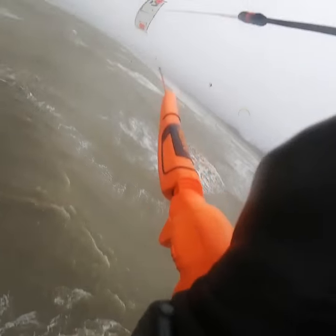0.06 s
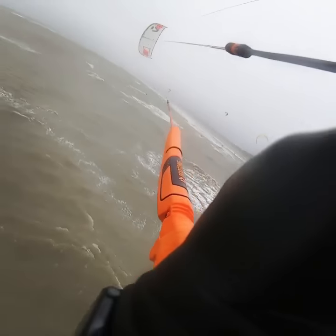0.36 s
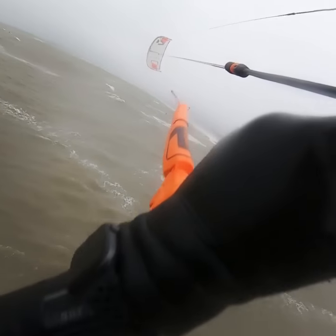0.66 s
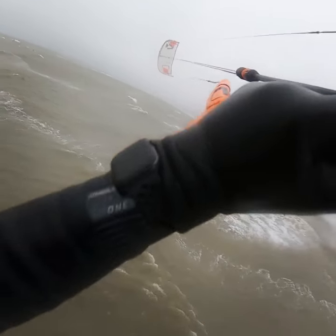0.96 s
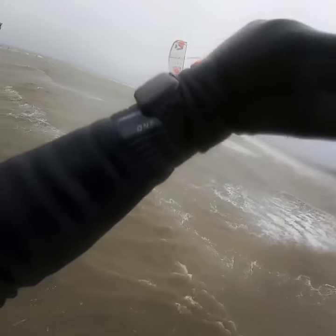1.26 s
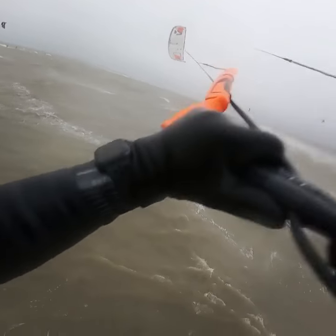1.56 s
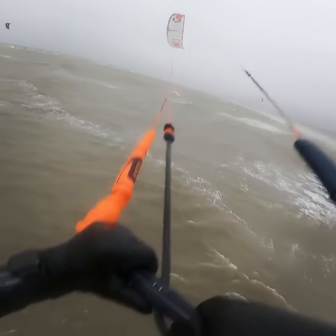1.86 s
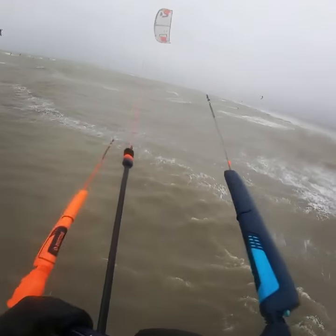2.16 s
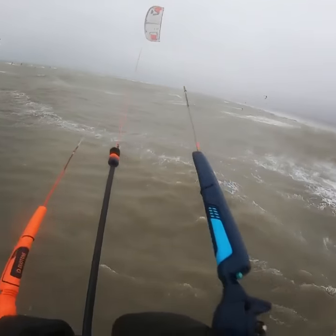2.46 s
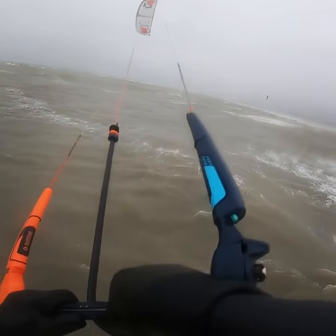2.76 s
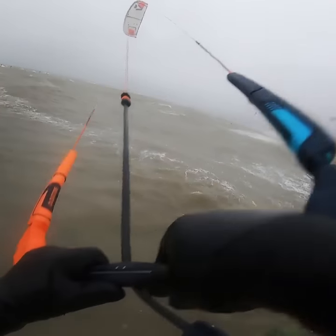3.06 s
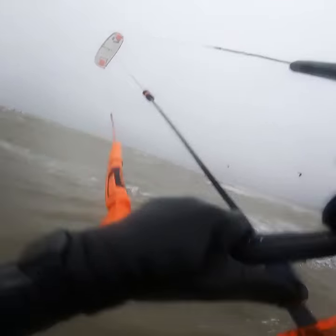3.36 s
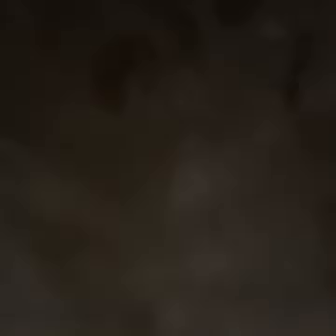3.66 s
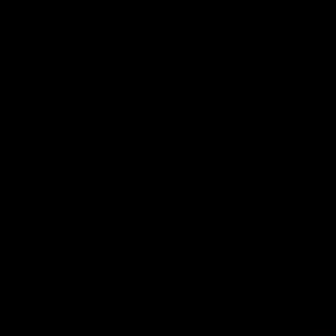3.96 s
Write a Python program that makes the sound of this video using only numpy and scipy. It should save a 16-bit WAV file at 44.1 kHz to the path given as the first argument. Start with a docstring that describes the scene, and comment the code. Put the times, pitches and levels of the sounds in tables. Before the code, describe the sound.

Muffled wind rumble and board thumps on choppy water, then a splash and gurgling bubbles.

```python
"""Wind buffets a kitesurfer's muffled body camera: turbulent pressure rumbles and gusts on the
microphone over the wash of the board, which thumps across the chop and drones as it settles.
The board digs in, drop impacts build into spray, and the rider hits the water with a sharp splash.
Under the surface, water slaps the housing, and trapped air resonates as ringing pockets,
a low churn of big bubbles and a fizz of small ones."""
import sys
import numpy as np
from scipy import signal
from scipy.fft import rfft, irfft
from scipy.io import wavfile
from scipy.ndimage import uniform_filter1d

SR = 44100
rng = np.random.default_rng(int(sys.argv[2]) if len(sys.argv) > 2 else 0)


def unload_wav(signal):
    """Save mono or channel-first audio to the path in sys.argv[1] as 16-bit WAV at rate SR, clipped to [-1, 1]."""
    wavfile.write(
        sys.argv[1],
        SR,
        np.round(np.clip(np.atleast_2d(signal).T, -1, 1) * 32767).astype(np.int16),
    )


N = 176400
TIME, FREQ = np.arange(N) / SR, np.fft.rfftfreq(N, 1 / SR)
ONSET_S, RELEASE_S = 0.01, 0.04


def amp(db):
    """Amplitude ratio of a level in decibels."""
    return 10 ** (np.asarray(db) / 20)


def unit(x):
    """Normalisation to rms 1."""
    return x / np.sqrt(np.mean(x ** 2) + 1e-20)


def envelope(points):
    """Amplitude along a level curve, fading in just before its first point and holding its last."""
    s, db = np.transpose(points)
    return amp(np.interp(TIME, s, db)) * np.clip(1 + (TIME - s[0]) / ONSET_S, 0, 1) ** 2


def until(s):
    """Linear fade-out that begins at time s."""
    return np.clip(1 - (TIME - s) / RELEASE_S, 0, 1)


def response(spectrum, hz):
    """Magnitude response interpolated over log frequency, silent above its last point."""
    f, db = np.transpose(spectrum)
    return amp(np.interp(np.log(hz + 1), np.log(f), db, right=-140))


def colour(x, spectrum):
    """Zero-phase filtering by a spectrum, to rms 1."""
    return unit(irfft(rfft(x) * response(spectrum, FREQ), N))


def lowpass(x, cutoff_hz):
    """Zero-phase low-pass filtering with a fourth-order slope."""
    return irfft(rfft(x) / (1 + (FREQ / cutoff_hz) ** 4), N)


def wander(rate_hz):
    """Smooth random modulation at around the given rate, rms 1."""
    ratio = FREQ / rate_hz
    return unit(irfft(rfft(rng.standard_normal(N)) * ratio * np.exp(-ratio ** 2), N))


def turbulence(spectrum, rough_db, rate_hz):
    """Intermittency: eddies modulate the level of coloured noise."""
    return unit(colour(rng.standard_normal(N), spectrum) * amp(rough_db * wander(rate_hz)))


def steady(x, span_s):
    """Division by the running rms evens out slow swells and keeps the fine grain."""
    size = max(int(span_s * SR), 3)
    power = uniform_filter1d(uniform_filter1d(x ** 2, size), size)
    return x / np.sqrt(abs(power) + 1e-6)


def impacts(per_s, spread_db):
    """Shot noise: a Poisson train of impulses of uneven size."""
    arrivals = (rng.random(N) < per_s / SR) * rng.choice([-1., 1.], N)
    return arrivals * amp(spread_db * np.minimum(rng.exponential(1, N), 3))


def bubbles(per_s, low_hz, high_hz, cycles, glide, spread_db, count=28):
    """Bubble resonance: randomly struck damped oscillators that decay by 1/e in `cycles` periods."""
    out = np.zeros(N)
    for hz in np.geomspace(low_hz, high_hz, count):
        age = np.arange(int(6 * cycles / hz * SR)) * hz / SR / cycles  # in decay times
        shape = (1 - np.exp(-age * 6)) * np.exp(-age)
        ring = shape * np.sin(2 * np.pi * cycles * (age + glide * age ** 2))
        out += signal.oaconvolve(impacts(per_s / count, spread_db), ring * hz / high_hz)[:N]
    return unit(out)


# pressure on the microphone: t/s, level/dB
RUMBLE_LEVEL = [(0, -34), (.25, -45), (.5, -31.5), (.66, -37), (.82, -19), (1.0, -28), (1.45, -26),
                (1.55, -17.5), (1.66, -22.5), (1.82, -16.5), (1.92, -20), (2, -29.5), (2.4, -17.5),
                (2.52, -22), (3, -15), (3.63, -15), (3.7, -41), (3.76, -14.5), (4, -18.5)]
# its spectrum: f/Hz, relative level/dB
RUMBLE_SPECTRUM = [(10, -6), (24, 2), (40, -7), (110, -12.5), (200, -35), (900, -100)]


def rumble():
    """Pseudo-sound: deep pressure swings of air, then water, flowing over the microphone."""
    pressure = turbulence(RUMBLE_SPECTRUM, rough_db=2.5, rate_hz=11)
    return envelope(RUMBLE_LEVEL) * steady(pressure, span_s=0.055)


# gusts across the microphone port: t/s, level/dB
GUST_LEVEL = [(0, -58), (.74, -50.5), (.86, -28.5), (1.06, -43), (1.39, -22.5), (1.5, -33.5), (1.95, -30),
              (2.25, -26.5), (2.6, -21), (2.73, -23), (2.97, -19.5), (3.08, -23.5), (3.5, -16)]
# their spectrum: f/Hz, relative level/dB
GUST_SPECTRUM = [(40, -25), (150, 3), (300, -1), (450, -8.5), (680, -23), (900, -46), (2200, -69.5)]


def wind():
    """Turbulent buffeting: eddies strike the microphone port until it goes under."""
    eddies = turbulence(GUST_SPECTRUM, rough_db=3.0, rate_hz=35)
    return envelope(GUST_LEVEL) * steady(eddies, span_s=0.14) * until(3.56)


# water washing past the hull, and the carving edge: t/s, level/dB
WASH_LEVEL = [(0, -45), (.35, -42.5), (.62, -54), (.82, -44.5), (1.38, -30.5), (1.9, -36), (2.45, -50.5)]
CARVE_LEVEL = [(0, -34), (.1, -42.5), (.22, -39), (.35, -33.5), (.5, -52.5)]
# their spectra: f/Hz, relative level/dB
WASH_SPECTRUM = [(110, -10), (320, 4), (440, -4), (580, 7), (760, 1.5), (880, -14), (1180, -7.5),
                 (1400, -21), (1750, -39), (3200, -62.5)]
CARVE_SPECTRUM = [(300, -21), (600, -3), (750, 9), (900, -11.5), (1230, -6.5), (1500, -72.5)]


def board():
    """Flow noise: a muffled wash along the hull and the hollow rush of the carving edge."""
    wash = envelope(WASH_LEVEL) * turbulence(WASH_SPECTRUM, rough_db=0.5, rate_hz=37)
    carve = envelope(CARVE_LEVEL) * turbulence(CARVE_SPECTRUM, rough_db=0.5, rate_hz=110)
    return wash + carve * until(.6)


# blows of the chop: t/s, level/dB, decay/s, frequency scale
CHOP_BLOWS = [(0.677, -35, 0.016, 0.8), (0.789, -18.5, 0.046, 1.065), (1.123, -23.5, 0.035, 0.87),
              (2.042, -19, 0.018, 1.12), (2.157, -17, 0.098, 1.11), (2.367, -18.5, 0.028, 1.02)]
# their spectrum before scaling: f/Hz, relative level/dB
THUMP_SPECTRUM = [(60, -13.5), (150, 5), (290, -0.5), (430, -6), (700, -19), (900, -52), (2200, -72)]


def thumps():
    """Structure-borne sound: dull blows of the board on the chop travel up through the rider."""
    out = np.zeros(N)
    for s, db, decay, scale in CHOP_BLOWS:
        rise = np.clip((TIME - s) / ONSET_S, 0, 1)
        fall = np.exp(-(np.maximum(TIME - s - ONSET_S, 0) / decay) ** 2)
        body = colour(rng.standard_normal(N), [(hz * scale, gain) for hz, gain in THUMP_SPECTRUM])
        out += amp(db) * rise * fall * steady(body, span_s=0.015)
    return out


# hollow drone of the hull after it lands: t/s, level/dB, f/Hz
HULL_DRONE = [(2.152, -20.5, 295.2), (2.388, -25.5, 260), (2.558, -26.5, 166.2), (3.05, -30, 154.7)]


def drone(half_width_hz=45):
    """Narrow-band noise whose centre frequency sinks as the board settles into the water."""
    s, db, hz = np.transpose(HULL_DRONE)
    band = lowpass(rng.standard_normal((2, N)), half_width_hz)
    phase = 2 * np.pi * np.cumsum(np.interp(TIME, s, hz)) / SR
    rush = steady(unit(band[0] * np.cos(phase) + band[1] * np.sin(phase)), span_s=.05)
    return amp(np.interp(TIME, s, db)) * rush * np.clip((TIME - s[0]) / ONSET_S, 0, 1) * until(s[-1])


# spray thrown up as the board digs in: t/s, level/dB
SPRAY_LEVEL = [(3.13, -24), (3.27, -22), (3.33, -19), (3.38, -19.5), (3.428, -15.5), (3.465, -18.5),
               (3.525, -16.5), (3.55, -18)]
# its spectrum at full force: f/Hz, relative level/dB
SPRAY_SPECTRUM = [(50, -15), (200, -1.5), (650, 1.5), (1250, 1), (2400, -12), (3400, -26), (5500, -40.5),
                  (12000, -66.5)]


def spray(db_per_octave=5):
    """Impact noise: drops patter on the camera, and harder spray shifts the spectrum upward."""
    force = envelope(SPRAY_LEVEL)
    hz, s, frames = signal.stft(impacts(per_s=3800, spread_db=3), SR, nperseg=512, noverlap=384)
    force_db = 20 * np.log10(np.interp(s, TIME, force) / force.max())
    scale = 2 ** np.maximum(force_db / db_per_octave, -2)
    frames *= response(SPRAY_SPECTRUM, hz[:, None] / scale)
    patter = signal.istft(frames, SR, nperseg=512, noverlap=384)[1][:N]
    return force * steady(unit(patter), span_s=0.06) * until(3.65)


# sheets of water hitting the camera: t/s, level/dB, rise/s, hold/s, time to fall 40 dB/s
WATER_SHEETS = [(3.373, -31, 0.025, 0.01, 0.0374), (3.551, -14.5, 0.039, 0.021, 0.09),
                (3.617, -20.5, 0.024, 0.02, 0.047)]
# their spectrum at the loudest moment: f/Hz, relative level/dB
SPLASH_SPECTRUM = [(200, -4), (900, 1.5), (2000, -6.5), (3100, -8.5), (6000, -17.5), (10500, -36.5),
                   (13000, -74)]


def splashes():
    """Superposition of drop impacts and bubble rings; the finest spray comes only at the peak."""
    shape = np.zeros(N)
    for s, db, rise, hold, fall in WATER_SHEETS:
        t = TIME - s
        shape += amp(db - 40 * np.maximum(t - rise - hold, 0) / fall) * np.clip(t / rise, 0, 1)
    drops = unit(impacts(per_s=4000, spread_db=5))
    rings = bubbles(per_s=1400, low_hz=900, high_hz=4000, cycles=11, glide=0, spread_db=4.5)
    water = steady(colour(drops + 0.4 * rings, SPLASH_SPECTRUM), span_s=0.042)
    dull = lowpass(water, cutoff_hz=2800)
    return shape * (dull + (water - dull) * (shape / shape.max()) ** 2)


# large air pockets: t/s, starting f/Hz, level/dB, duration/s, glide/(octaves per s)
AIR_POCKETS = [(3.512, 326, -5, 0.019, 19), (3.67, 542, -5, 0.0089, 4.5), (3.688, 450, -17.5, 0.063, -1),
               (3.756, 540, -10.5, .016, -5.5), (3.75, 1088, -26, 0.083, 2.6), (3.785, 779, -26, 0.21, -3),
               (3.791, 397, -14, 0.029, -15), (3.814, 286, -7, 0.029, -9), (3.815, 1146, -21.5, 0.1, -5.5),
               (3.852, 424, -6.5, 0.014, 23), (3.927, 236, -6.5, 0.027, 11), (3.965, 730, -8, 0.013, 5)]


def pockets(skew=0.55):
    """Volume resonance: large air pockets swell and ring with gliding, slightly unsteady pitch."""
    out = np.zeros(N)
    for s, hz, db, length, glide in AIR_POCKETS:
        t = np.clip(TIME - s, 0, length)
        pitch = hz * 2 ** (glide * t) * (1 + 0.0087 * wander(rate_hz=35))
        shape = np.sin(np.pi * (t / length) ** skew) ** 2  # skew below 1: swells faster than it fades
        out += amp(db) * shape * np.sin(2 * np.pi * np.cumsum(pitch * (t > 0)) / SR)
    return out


# churning of the air dragged under: t/s, level/dB
CHURN_LEVEL = [(3.56, -29), (3.6, -13), (3.655, -13.5), (3.685, -26), (3.735, -18), (3.86, -20.5),
               (3.91, -9.5), (4, -18)]


def churn():
    """Air entrainment: big, heavily damped bubbles merge into a low gurgle."""
    gurgle = bubbles(per_s=490, low_hz=109.6, high_hz=540, cycles=2.55, glide=0.026, spread_db=8.0)
    return envelope(CHURN_LEVEL) * steady(gurgle, span_s=0.0075)


def clusters(drive, low_hz=1552, high_hz=4690, width_hz=85, drift=.03, swell_db=8, count=10):
    """Forced resonance: clusters of trapped bubbles ring, each drifting in pitch and level."""
    out = np.zeros(N)
    pole = np.exp(-np.pi * width_hz / SR)
    for hz in np.geomspace(low_hz, high_hz, count):
        pitch = hz * (1 + drift * wander(rate_hz=10.2))
        carrier = np.exp(2j * np.pi * np.cumsum(pitch) / SR)
        # shifting down, low-passing and shifting back makes a band that follows the pitch
        ring = signal.lfilter([(1 - pole) ** 2], [1, -2 * pole, pole ** 2], drive / carrier)
        out += amp(swell_db * np.tanh(wander(rate_hz=22.4))) * (carrier * ring).real
    return out


# slaps of water on the housing: t/s, relative level/dB, decay/s
HOUSING_SLAPS = [(3.588, -11, 0.003), (3.598, -24, 0.004), (3.726, -24.5, 0.0026), (3.7609, -13.5, 0.0021),
                 (3.778, -25, 0.005), (3.8165, -13.5, 0.012), (3.876, -12.5, 0.0026), (3.891, -15, 0.0036),
                 (3.956, -18.5, 0.012)]
# response of the housing to water striking it: f/Hz, relative level/dB
HOUSING_SPECTRUM = [(200, -12), (1130, 12.5), (1340, 0.5), (1600, 1), (3100, -2.5), (5400, -22),
                    (6200, -34), (8500, -29.5), (12000, -50)]


def slaps(rise_s=0.00042, hold_s=.002):
    """Cavity collapse: air pockets smack shut against the housing and excite the bubble clusters."""
    shape = np.zeros(N)
    for s, db, decay in HOUSING_SLAPS:
        t = TIME - s
        shape += amp(db) * np.clip(t / rise_s, 0, 1) * np.exp(-np.maximum(t - hold_s, 0) / decay)
    smack = shape * steady(colour(rng.standard_normal(N), HOUSING_SPECTRUM), span_s=0.011)
    return 0.72 * smack + 2 * clusters(smack)


# fine bubbles on the housing: t/s, level/dB
FIZZ_LEVEL = [(3.69, -48.5), (3.75, -35), (3.86, -36), (3.885, -25), (3.95, -28), (4, -48)]


def fizz():
    """Impulse excitation: fine bubbles crackle on the housing and set the clusters ringing."""
    crackle = colour(impacts(per_s=3000, spread_db=4.0), HOUSING_SPECTRUM)
    return envelope(FIZZ_LEVEL) * steady(crackle + 5 * clusters(crackle), span_s=0.04)


def scene():
    """Superposition in one channel: the ride, the crash and the bubbling over a faint hiss."""
    hiss = amp(-103) * rng.standard_normal(N)
    ride = rumble() + wind() + board() + thumps() + drone()
    crash = spray() + splashes() + slaps()
    bubbling = pockets() + churn() + fizz()
    return (ride + crash + bubbling + hiss)[None]


def record(dry, knee=.8, cutoff_hz=11700):
    """Soft saturation rounds peaks above the knee; a low-pass filter then limits the bandwidth."""
    linear = np.clip(dry, -knee, knee)
    saturated = linear + (1 - knee) * np.tanh((dry - linear) / (1 - knee))
    band_limit = signal.firwin(301, cutoff_hz, window=("kaiser", 9), fs=SR)
    return signal.oaconvolve(saturated, band_limit[None], "same")


dry = scene()
out = record(dry)
unload_wav(out)
```